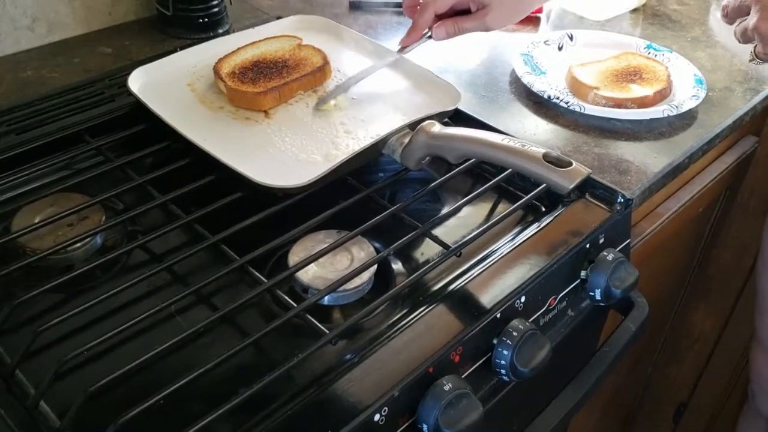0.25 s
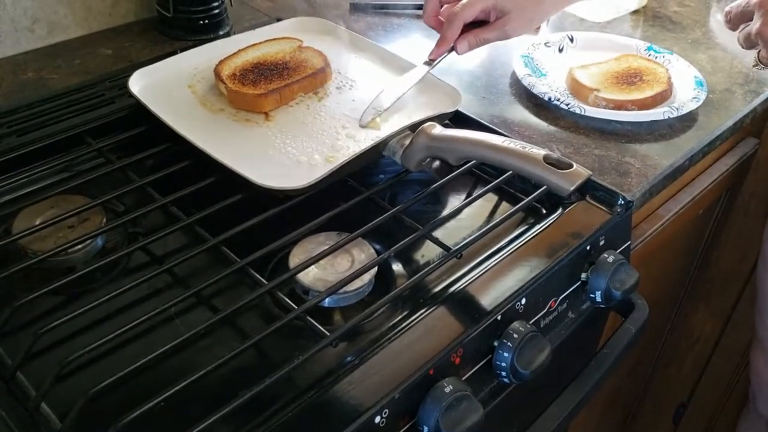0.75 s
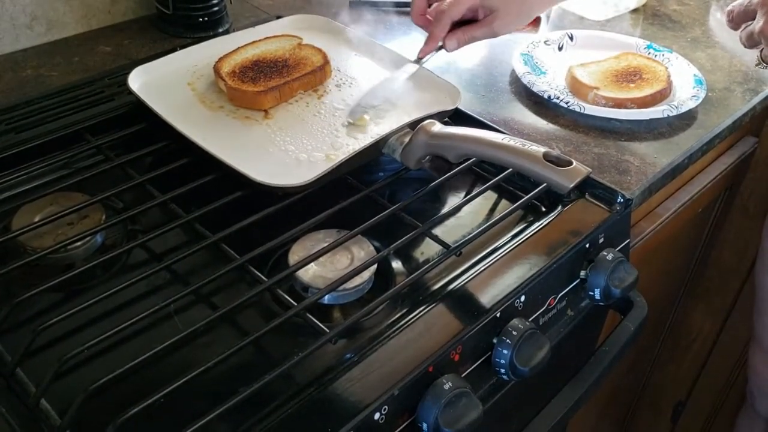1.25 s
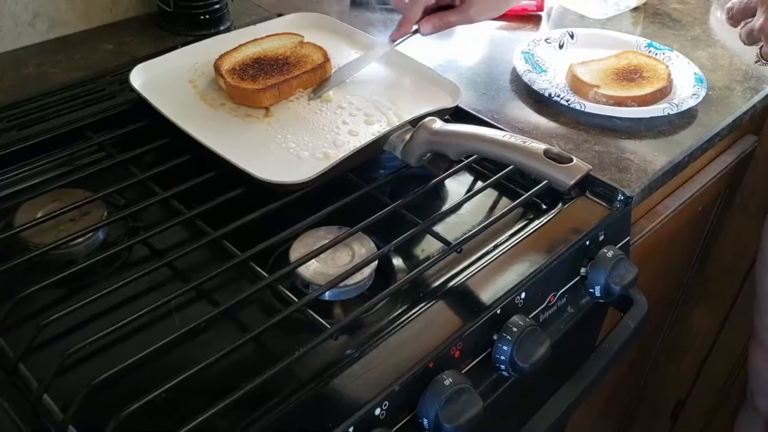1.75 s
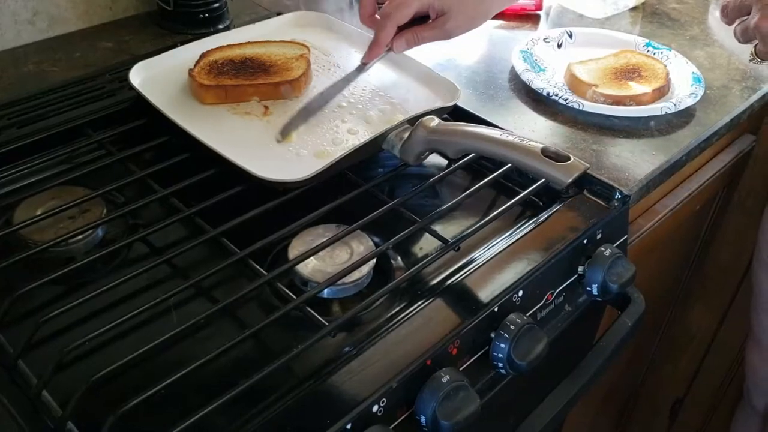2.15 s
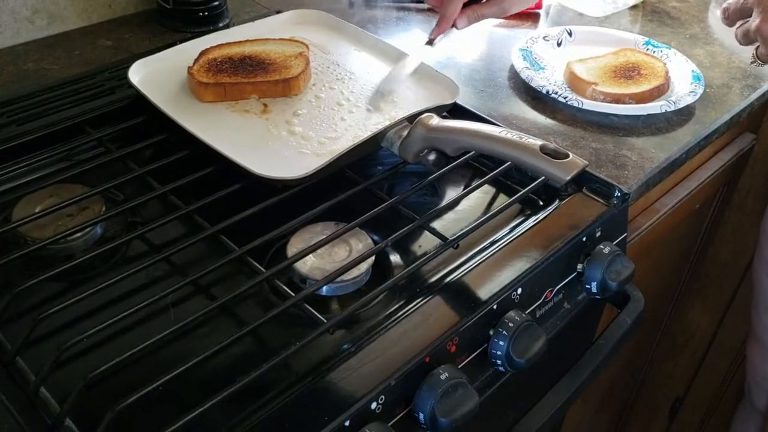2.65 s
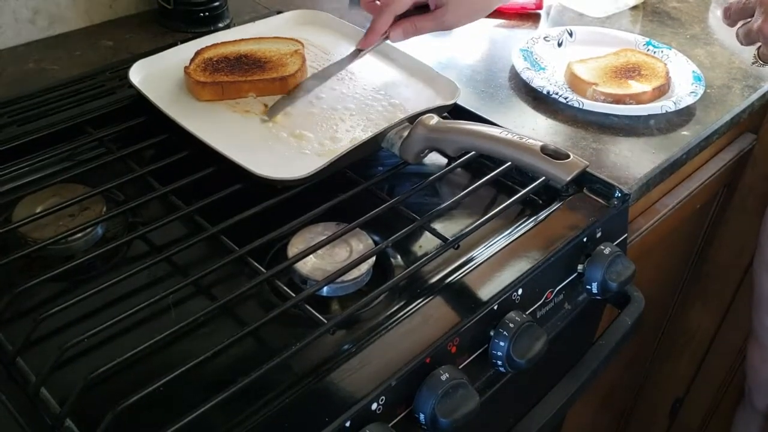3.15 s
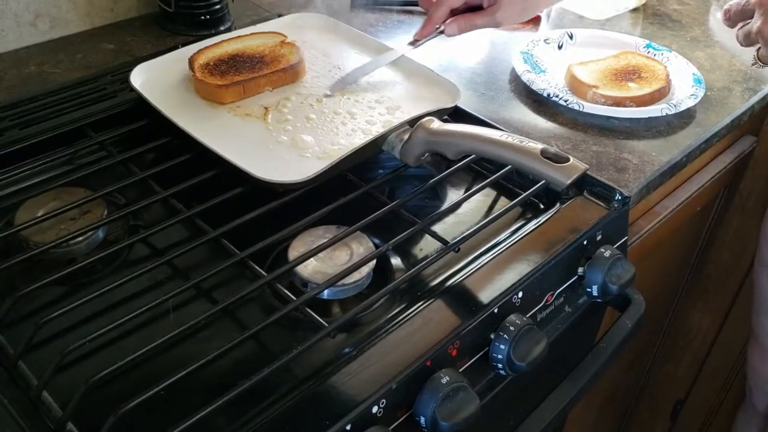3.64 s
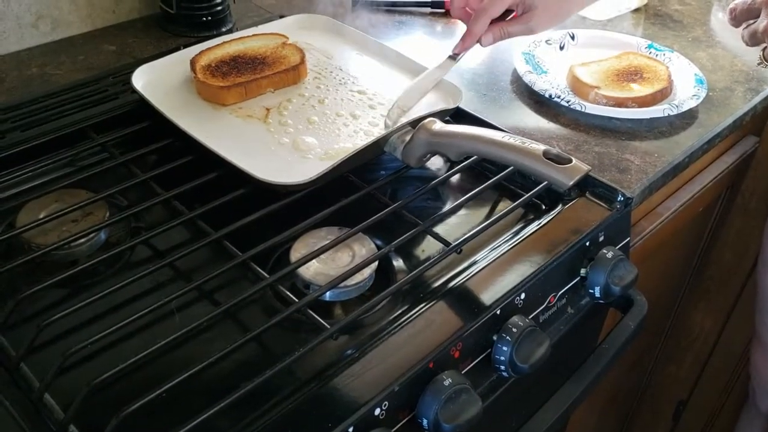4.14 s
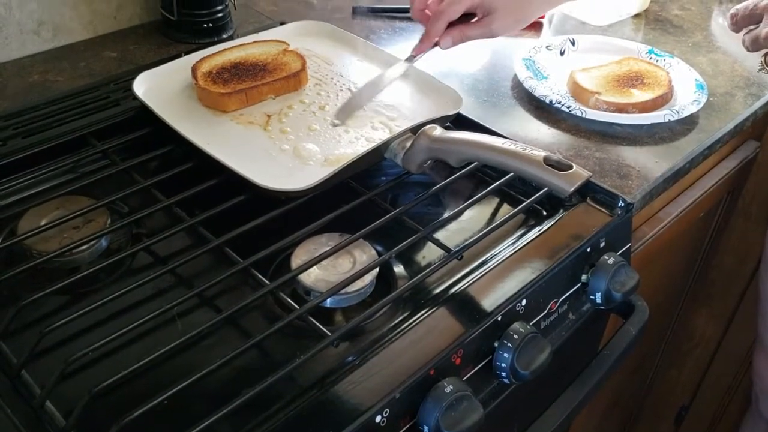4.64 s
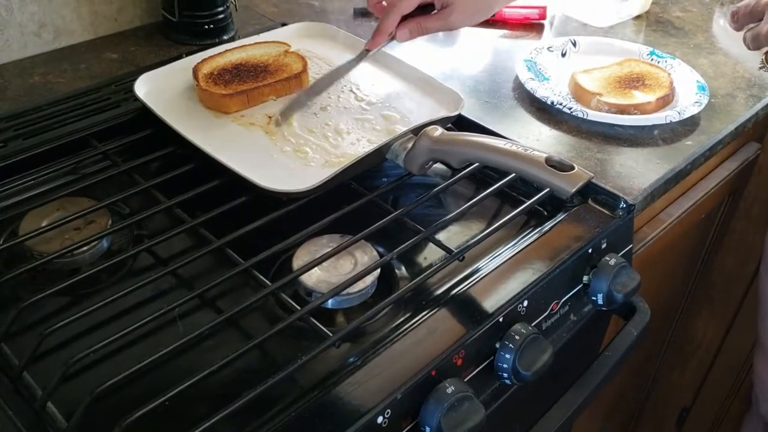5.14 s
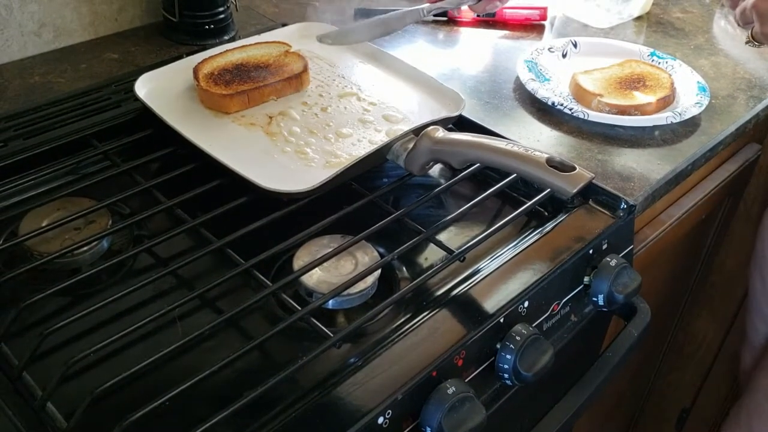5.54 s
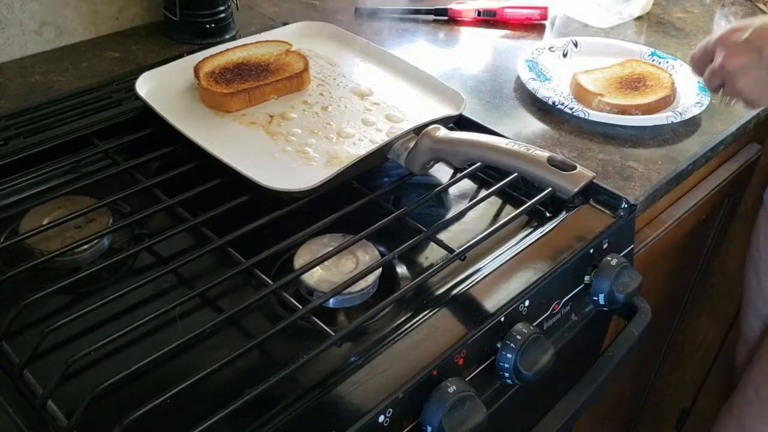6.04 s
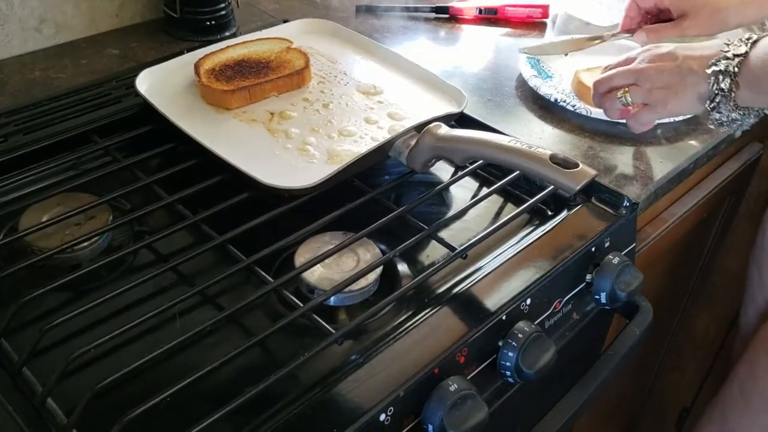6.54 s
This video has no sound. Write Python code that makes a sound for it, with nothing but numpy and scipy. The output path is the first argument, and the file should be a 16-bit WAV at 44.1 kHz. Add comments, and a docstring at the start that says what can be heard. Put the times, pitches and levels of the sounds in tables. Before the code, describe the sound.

Close in a small, fairly dry kitchen, butter sizzles as very high, fine fizz with crackly spitting. Early on a knife strikes the pan with a bright bouncing clink, the loudest event, quickly stilled. Short soft scrapes follow with a slightly squeaky, hollow metallic tone, firmer and busier toward the middle. Dull stove bumps occur occasionally; after the scraping stops, the sizzle continues and a paper plate rustles briefly. A faint low rumble leans left.

```python
"""Butter sizzles on a hot griddle pan over a gas ring in a small kitchen: dense random clicks make
fine fizz and coarse spitting, patchy narrow noise bands a low sizzle. Shaped noise makes a low rumble
of flame and house. A knife hits the pan, bounces and touches it again softly, ringing its modes, then
pushes the butter about in strokes whose clicks excite moving resonances. Soft bumps on the stove are
short damped rings; near the end a paper plate rustles."""
import sys
import numpy as np
from scipy import signal
from scipy.fft import rfft, irfft, next_fast_len
from scipy.io import wavfile
from scipy.ndimage import uniform_filter1d

SR = 44100
rng = np.random.default_rng(int(sys.argv[2]) if len(sys.argv) > 2 else 0)


def to_wav(s):
    """Save 16-bit WAV."""
    ch = np.atleast_2d(s).T  # columns
    pcm = np.round(np.clip(ch, -1, 1) * 32767)  # PCM
    wavfile.write(sys.argv[1], SR, pcm.astype(np.int16))


N = 299340

# frying curve, before trims: time_s, fizz_db, spit_db, low_sizzle_db
FRYING_LEVELS = [(0.0, -44, -53, -103), (0.23, -45, -60, -78), (0.38, -43, -68, -66), (0.47, -37, -50, -63),
                 (0.62, -37.5, -51.5, -70.5), (0.92, -42.5, -51.5, -68.5), (1.01, -32, -46.5, -55.5),
                 (1.17, -39, -50.5, -69), (1.28, -39, -53, -89.5), (1.53, -44.5, -54.5, -99),
                 (1.62, -34, -49, -62.5), (1.93, -35, -45.5, -68.5), (2.34, -35.5, -52, -63),
                 (2.53, -39.5, -52, -68), (2.76, -39, -53, -79.5), (2.82, -35.5, -51.5, -59),
                 (2.93, -39.5, -50, -87), (3.02, -36.5, -48, -64), (3.27, -37.5, -51, -77),
                 (3.36, -35.5, -47, -70), (3.57, -36.5, -50.5, -105.5), (3.85, -42.5, -51, -95),
                 (3.89, -37, -52, -102.5), (4.0, -39.5, -55, -111), (4.21, -53.5, -71.5, -111),
                 (4.25, -58.5, -85, -108), (4.42, -35.5, -47.5, -61), (4.58, -37, -52, -81),
                 (4.95, -39, -49, -69.5), (5.1, -36, -55, -74), (5.15, -40, -48.5, -105),
                 (5.33, -33.5, -52, -55), (5.52, -39, -53.5, -112), (5.61, -38, -49, -77.5),
                 (6.79, -41, -47.5, -70.5)]
# outline of fine fizz: freq_hz, density_db_per_hz
FIZZ_SPECTRUM = [(5000, -56), (7500, -7), (9500, -7), (11500, 2.5), (13000, 1), (14700, 8), (15600, 3),
                 (16500, -28.5)]
# outline of coarse spitting: freq_hz, density_db_per_hz
SPIT_SPECTRUM = [(2700, -48), (3250, -13), (3700, -5), (4500, -9.5), (6000, -6.5), (6800, -4), (8500, -7.5),
                 (11000, -4)]
# low sizzle, levels of its narrow bands: centre_hz, level_db
LOW_SIZZLE_BANDS = [(1600, -13.5), (1800, 6.5), (2100, -4), (2500, -0.5), (3000, -2.5), (3400, -11.5)]
# low rumble curve: time_s, level_db
RUMBLE_LEVELS = [(0.0, -55), (0.38, -57), (1.47, -54), (1.89, -67.5), (2.21, -50.5), (2.44, -61.5),
                 (3.1, -56), (3.33, -71), (3.38, -56.5), (3.97, -61), (6.71, -56), (6.79, -57.5)]
# outline of rumble: freq_hz, density_db_per_hz
RUMBLE_SPECTRUM = [(15, -51.5), (25, -16.5), (54, 6), (70, 8.5), (122, -2.5), (161, -17.5), (204, -12),
                   (259, -24.5), (298, -17.5), (420, -58), (550, -69.5), (920, -120)]
# knife on pan (a short noisy swell leads into the hit, then bounces and a late soft touch):
# start_s, level_db, rise_s, rattle_decay_s, sharpness_hz, ring_db
KNIFE_TAPS = [(0.244, -20, .02, 0.02, 12000, -60), (0.2608, -20, .0014, 0.01, 9000, -22),
              (0.2695, -25, .001, .01, 7000, -34), (0.2775, -23, .001, .012, 6000, -34),
              (0.289, -28, .001, .014, 5000, -45), (0.298, -31, .002, .05, 3500, -50),
              (0.403, -30, .002, 0.013, 6000, -38)]
# modes of the struck pan: pitch_hz, level_db, t60_s
STRUCK_MODES = [(450, -22, .22), (521, -20, .22), (588, -20, .28), (636, -9, .25), (856, -22, .1),
                (911, -20, .37), (968, -16, .5), (1039, -9, .12), (1113, -14, .24), (1158, -18, .18),
                (1416, -21, .18), (1513, -24, .28), (1901, -15, .25), (2073, -16, .27), (2155, -6, .13),
                (2580, -16, .3), (2602, -16, .33), (2632, -14, .24), (2848, -18, .15), (4237, -9, .1),
                (4315, -12, .09), (13313, -3, .07)]
# outline of blade rattle: freq_hz, density_db_per_hz
CLATTER_SPECTRUM = [(150, -73), (300, -30.5), (450, -7.5), (700, -12), (1100, -6.5), (1600, -23),
                    (2200, -7.5), (3300, -15.5), (4300, -1), (5900, -18.5), (7000, -6), (8200, -18),
                    (10500, -6), (13300, 0.5), (16000, 3)]
# soft bumps against the stove: start_s, level_db, pitch_hz
STOVE_BUMPS = [(2.274, -42.5, 227), (1.09, -66, 740), (2.547, -69, 635), (5.62, -41, 272), (6.0, -64, 400),
               (6.594, -71, 493), (6.684, -55, 310)]
# knife strokes: start_s, length_s, first_level_db, last_level_db, brightness_db, weight_db,
# first_main_resonance_hz
KNIFE_STROKES = [(1.446, 0.25, -71, -59.5, 6, -42, 997), (1.562, 0.1, -51.5, -44, -4.5, -65, 1081),
                 (1.733, 0.29, -51, -70, -4, -55, 1036), (1.97, 0.12, -75, -53, 3.5, -34, 1114),
                 (2.143, 0.039, -87.5, -87.5, 23, 20, 1095), (2.266, 0.15, -64, -74, 3.5, -6, 804.5),
                 (2.628, 0.047, -69, -89.5, 14, -3, 993), (2.727, 0.051, -54, -49.5, 0.5, -21.5, 1065),
                 (2.897, 0.093, -62.5, -50.5, 3, -9, 990), (3.052, 0.055, -51, -47, -4.5, -26, 1035),
                 (3.161, 0.081, -59, -70, 3.5, -42.5, 1009), (3.293, 0.1, -56, -64, 2, -22.5, 1070),
                 (3.439, 0.3, -61, -56, -2.5, -46, 1067), (3.63, 0.092, -49.5, -56, -6, -24.5, 1077),
                 (3.752, 0.14, -59, -63, -1, -41.5, 1016), (3.866, 0.064, -47.5, -60.5, -2, -25, 1057),
                 (4.244, 0.063, -56, -54.5, -3, -6.5, 999), (4.328, 0.092, -54, -51.5, 1, -16, 1023),
                 (4.452, 0.03, -70, -100, 7.5, -33, 1060), (4.621, 0.095, -53.5, -61, 2, -5.5, 1047),
                 (4.754, 0.027, -53.5, -52.5, -6, -36, 1019), (4.88, 0.092, -55.5, -50.5, 0.5, -17, 1025),
                 (4.97, 0.074, -44.5, -56, 1, -15.5, 1060), (5.123, 0.073, -46.5, -67, -4, -8.5, 1040),
                 (5.276, 0.032, -45, -43.5, -1, -3.5, 1035), (5.345, 0.057, -64, -73.5, -1, -1, 1040)]
# other pan resonances under the blade: centre_hz, width_hz, level_db
RUBBED_RESONANCES = [(394, 90, -1.5), (477, 71, -10.5), (653, 73, -21), (855, 77, -9.5), (1753, 88, -11),
                     (1827, 63, -4), (1942, 97, -9.5), (2455, 82, -10.5), (2583, 91, -9.5), (3540, 80, -7),
                     (3845, 118, -5.5), (3930, 77, -7), (5000, 170, -5.5)]
# upper pan resonances that sing along: pitch_hz, level_db (against the main one)
SUNG_OVERTONES = [(1860, -18.5), (2590, -4)]
# outline of paper plate rustle: freq_hz, density_db_per_hz
PLATE_SPECTRUM = [(500, -78), (850, 14), (1050, -51), (1200, 1), (1350, -26), (1550, 10), (1950, 8),
                  (2500, 4.5), (3400, 8)]
# microphone colour: freq_hz, left_minus_right_db
PORT_BALANCE = [(60, -12.5), (150, -1), (260, 2), (450, 12.5), (700, 0), (1290, -5), (2400, 2),
                (4400, -4.5), (8100, -4), (15000, -9)]

# frying
SPIT_TRIM_DB, LOW_SIZZLE_TRIM_DB = 3.5, 6.0
SPIT_UNEVEN_DB, SPIT_MEAN_DB = 2.5, -47.5
LOW_SPIT_EXTRA = 0.97   # share by which the lowest band exaggerates a sink below the mean
LOW_SIZZLE_WAVER_DB, LOW_SIZZLE_WAVER_HZ = 4.5, 5.0
# spitting thrown up by a firm stroke; share of the stroke's swing it follows
STROKE_SPATTER_DB, SPATTER_FOLLOWS = -56, 0.99
TAP_SPATTER_DB, TAP_FIZZ_DB = -3, -23   # against the tap's level
TAP_SPATTER_DECAY_S, TAP_SPATTER_RISE_S = 0.0067, 0.003
# rumble
RUMBLE_WAVER_DB = 1.5
RUMBLE_LEFT_DB, RUMBLE_TOP_LEFT_DB = 13.5, 9   # left minus right
# the blade comes to rest on the pan and stills it
DAMPED_FROM_S, DAMPING_DB_PER_S = .45, 280
# strokes
STROKE_RISE_DB_PER_S, STROKE_FALL_DB_PER_S, LIFTED_DB = 902, 703, -125
PAN_REST_HZ, PAN_SETTLE_S = 1074, 0.099   # the main resonance settles here during a stroke
FIRM_DB, UPPER_FOLLOWS = -58.5, 0.93   # upper resonances swing less than the main one around firm
# the squeal is steadier than the scrape: level, share of swing evened out, most lift
SQUEAL_DB, SQUEAL_EVENS, SQUEAL_MOST_DB = -4.5, 0.28, 1
SQUEAL_FLICKER_HZ = 31
LOW_LUMPS_DB, LOW_LUMPS_RATE_HZ = 8, 10   # dips between lumps of the low resonances
# rustle, room, top
RUSTLE_S, RUSTLE_LENGTH_S, RUSTLE_DB = 6.675, .016, -41
KITCHEN_T60_S, WALL_CUT_HZ = 0.16, 7600
CUTOFF_HZ = 15950


def from_db(db):
    """dB to gain."""
    return 10 ** (np.asarray(db) / 20)


def rms_one(x):
    """Scales to rms 1."""
    return x / np.sqrt(np.mean(x ** 2) + 1e-20)


def in_time(rows):
    """Columns of a curve table, sample by sample."""
    time_s, *columns = np.transpose(rows)
    return [np.interp(np.arange(N) / SR, time_s, column) for column in columns]


def colour(x, spectrum):
    """Shapes a signal to a (Hz, dB) outline, linear in log frequency."""
    hz = np.maximum(np.fft.rfftfreq(N, 1 / SR), 1)
    hz_points, db_points = np.transpose(spectrum)
    gain_db = np.interp(np.log(hz), np.log(hz_points), db_points)
    return irfft(rfft(x) * from_db(gain_db), N)


def drift(rate_hz):
    """Slow random curve of rms 1: noise through a double one-pole low-pass, one point per 40 samples."""
    pole = np.exp(-80 * np.pi * rate_hz / SR)
    noise = rng.standard_normal(N // 40 + 2002)
    slow = signal.lfilter([1], [1, -2 * pole, pole * pole], noise)[2000:]   # skips the settling
    return np.interp(np.arange(N) / 40, np.arange(len(slow)), rms_one(slow))


def clicks(per_s, spread_db, size=N):
    """Random clicks of either sign; their dB sizes are spread exponentially from 0, up to 5 spreads."""
    sizes = from_db(spread_db * np.minimum(rng.exponential(1, size), 5))
    signed = sizes * rng.choice([-1, 1], size)
    return signed * (rng.random(size) < per_s / SR) + 1e-18


def ring(x, hz, t60_s):
    """Two-pole resonator: a unit click sets a decaying sine of height 1 ringing."""
    r, w = from_db(-60 / (t60_s * SR)), 2 * np.pi * hz / SR
    return signal.lfilter([0, np.sin(w)], [1, -2 * r * np.cos(w), r * r], x)


def resonance(x, hz, width_hz):
    """Steep band around a centre that may move: shift down, low-pass, shift back; noise keeps its level."""
    turn = np.exp(2j * np.pi * np.cumsum(hz * np.ones(N)) / SR)
    low = signal.sosfilt(signal.butter(6, width_hz / 2, fs=SR, output="sos"), x / turn)
    return (low * turn).real * np.sqrt(2 * SR / width_hz)


def bubbles(spectrum, per_s, spread_db, patchy_db, hiss):
    """Bursts at six spots on the pan, each leading by its own lag on the right, over a smooth hiss."""
    out = np.zeros((2, N))
    for lead in range(2, 38, 6):
        rate_per_s = per_s / 6 * from_db(patchy_db * drift(20))
        spot = clicks(rate_per_s, spread_db)
        out += [np.roll(spot, lead), spot]
    out = rms_one(out) + hiss * rng.standard_normal((2, N))
    return rms_one(colour(out, spectrum))


def uneven_bands(x, level_db):
    """Noise bands with separate random levels; the spitting gets thinner below when quiet."""
    out, edges_hz = 0, np.geomspace(2600, 12000, 14)
    for k, (low_hz, high_hz) in enumerate(zip(edges_hz, edges_hz[1:])):
        band_pass = signal.butter(2, [low_hz, high_hz], "band", fs=SR, output="sos")
        band = signal.sosfilt(band_pass, x)
        sink_db = LOW_SPIT_EXTRA * (1 - k / 12) ** 2 * np.minimum(level_db - SPIT_MEAN_DB, 0)
        out = out + band * from_db(sink_db + SPIT_UNEVEN_DB * drift(15.0)) * (-1) ** k
    return out


def low_sizzle():
    """Patchy narrow noise bands at 1.6-3.4 kHz that come and go, each with its own lag on the left."""
    out = np.zeros((2, N))
    hz_points, db_points = np.transpose(LOW_SIZZLE_BANDS)
    for hz in np.geomspace(hz_points[0], hz_points[-1], 11):
        patch_db = 45.0 * np.minimum(drift(6.0), .1)
        gain = from_db(np.interp(hz, hz_points, db_points) + patch_db)
        band = gain * resonance(rng.standard_normal(N), hz, width_hz=hz / 16)
        out += [np.roll(band, rng.integers(0, 30)), band]
    waver = from_db(LOW_SIZZLE_WAVER_DB * np.minimum(drift(LOW_SIZZLE_WAVER_HZ), 1))
    return rms_one(out * waver)


def frying(blade_db):
    """Fizz, spitting and low sizzle on their own levels; knife strokes and taps throw up more spitting."""
    fizz_db, spit_db, low_sizzle_db = in_time(FRYING_LEVELS)
    t = np.arange(N) / SR
    jolt = 0
    for start_s, level_db, *_ in KNIFE_TAPS[1:]:   # the opening swell adds no spitting
        since = np.maximum(t - start_s, 0)
        swell = 1 - np.exp(-since / TAP_SPATTER_RISE_S)
        jolt = jolt + from_db(level_db) * np.exp(-since / TAP_SPATTER_DECAY_S) * swell
    stirred = from_db(STROKE_SPATTER_DB + SPATTER_FOLLOWS * (blade_db - FIRM_DB))

    fizz_gain = from_db(fizz_db) + from_db(TAP_FIZZ_DB) * jolt
    fizz = fizz_gain * bubbles(FIZZ_SPECTRUM, per_s=6200, spread_db=3.5, patchy_db=7.5, hiss=1.0)

    spit_gain = np.hypot(from_db(spit_db + SPIT_TRIM_DB), stirred) + from_db(TAP_SPATTER_DB) * jolt
    bursts = bubbles(SPIT_SPECTRUM, per_s=4000, spread_db=-1.0, patchy_db=8.5, hiss=1.0)
    spit = spit_gain * uneven_bands(bursts, 20 * np.log10(spit_gain))
    return fizz + spit + from_db(low_sizzle_db + LOW_SIZZLE_TRIM_DB) * low_sizzle()


def rumble():
    """Low noise of flame and house from the left, largely alike on both sides; its upper part flutters."""
    mid, side = colour(rng.standard_normal((2, N)), RUMBLE_SPECTRUM)
    pair = rms_one(mid + 0.53 * side * np.array([[1], [-1]]))
    low = signal.sosfilt(signal.butter(4, 210, "low", fs=SR, output="sos"), pair)
    high = signal.sosfilt(signal.butter(4, 210, "high", fs=SR, output="sos"), pair)
    lean = np.array([[.5], [-.5]])
    flutter_db = 5.5 * drift(2.6) - 1.0
    pair = low * from_db(RUMBLE_LEFT_DB * lean) + high * from_db(flutter_db + RUMBLE_TOP_LEFT_DB * lean)
    return from_db(in_time(RUMBLE_LEVELS)[0] + RUMBLE_WAVER_DB * drift(13.0)) * pair


def taps():
    """Each touch rings the pan's modes and makes the blade rattle for a moment; gives ring and rattle."""
    modes_hz, modes_db, modes_t60_s = np.transpose(STRUCK_MODES)
    count, span = len(modes_hz), SR // 4
    forces, clatter = np.full((count, N), 1e-18), np.zeros(N)
    since = np.arange(span) / SR
    for start_s, level_db, rise_s, decay_s, sharp_hz, ring_db in KNIFE_TAPS:
        at = round(start_s * SR)
        # every mode starts up to 2.5 ms late, at a slightly random strength
        late = rng.integers(0, SR // 400, count)
        strength_db = rng.normal(0, 1.5, count)
        forces[np.arange(count), at + late] += from_db(ring_db + modes_db + strength_db)
        envelope = from_db(level_db) * np.exp(-since / decay_s) * (1 - np.exp(-since / rise_s)) ** 2
        rattle = envelope * rms_one(clicks(4000, 0.55, size=span))
        low_pass = signal.butter(1, min(sharp_hz, .45 * SR), fs=SR)
        clatter[at:at + span] += signal.lfilter(*low_pass, rattle)
    rings = sum(ring(force, hz, t60_s) for force, hz, t60_s in zip(forces, modes_hz, modes_t60_s))
    # a thin pan radiates no bass
    rings = signal.sosfilt(signal.butter(4, 380, "high", fs=SR, output="sos"), rings)
    damping = from_db(-DAMPING_DB_PER_S * np.maximum(np.arange(N) / SR - DAMPED_FROM_S, 0))
    return rings * damping, from_db(10.0) * colour(clatter, CLATTER_SPECTRUM)


def bumps():
    """Each bump is one dull, short ring: a click through three damped resonators in series."""
    out = np.zeros(N)
    for start_s, level_db, hz in STOVE_BUMPS:
        push = np.full(N, 1e-18)
        push[round(start_s * SR)] = from_db(level_db - 22.5)
        body = ring(push, hz, 0.023)
        body = ring(body, hz * 0.77, 0.0098)
        out += ring(body, hz * 1.18, 0.016) * from_db(-34.0)
    return out


def strokes():
    """Blade level, brightness, weight (dB), main resonance (Hz): strokes land, hold, lift; firmest leads."""
    t = np.arange(0, N / SR + .002, .001)
    columns = np.transpose(KNIFE_STROKES)[:, :, None]
    start_s, length_s, first_db, last_db, bright_db, weight_db, first_hz = columns
    since = t - start_s
    held_db = first_db + (last_db - first_db) * np.clip(since / length_s, 0, 1)
    landing_db = STROKE_RISE_DB_PER_S * np.minimum(since, 0)
    lifting_db = STROKE_FALL_DB_PER_S * np.maximum(since - length_s, 0)
    each_db = held_db + landing_db - lifting_db
    settling = np.exp(-(np.maximum(since, 0) / PAN_SETTLE_S) ** 2)
    each_hz = PAN_REST_HZ + (first_hz - PAN_REST_HZ) * settling
    lead = each_db.argmax(axis=0)
    level_db = np.maximum(each_db.max(axis=0), LIFTED_DB)
    main_hz = each_hz[lead, np.arange(len(t))]
    curves = level_db, bright_db[lead, 0], weight_db[lead, 0], main_hz
    return in_time(np.transpose([t, *uniform_filter1d(curves, size=9)]))   # smoothed over 9 ms


def sing(hz):
    """Sine on a moving pitch."""
    return np.sin(2 * np.pi * np.cumsum(hz) / SR)


def scraping(level_db, bright_db, weight_db, main_hz):
    """The blade catches on the rough coat in dense clicks that excite pan resonances damped by butter."""
    upper_db = bright_db + (UPPER_FOLLOWS - 1) * (level_db - FIRM_DB)
    catches = rms_one(clicks(900 * from_db(4.0 * drift(30)), 2.85))
    # the main resonance bends as the blade loads other parts of the pan
    out = resonance(catches, main_hz, width_hz=140.0) * from_db(-8.0)
    core_hz = main_hz * (1 + 0.012 * drift(6.0))
    out += resonance(catches, core_hz, width_hz=43.8) * from_db(-4.5)

    evened_db = np.minimum(SQUEAL_EVENS * (FIRM_DB - level_db), SQUEAL_MOST_DB)
    squeal_db = SQUEAL_DB + evened_db + 2.0 * drift(SQUEAL_FLICKER_HZ)
    out += from_db(squeal_db) * sing(main_hz * (1 + 0.01028 * drift(15.8)))
    for hz, db in SUNG_OVERTONES:
        sung_hz = hz * (1 + 0.012 * drift(14.0))
        out += from_db(squeal_db + db + upper_db + 6.5 * drift(14.0)) * sing(sung_hz)

    for hz, width_hz, db in RUBBED_RESONANCES:
        if hz < 900:   # low resonances come in soft lumps
            lean_db = weight_db + LOW_LUMPS_DB * np.minimum(drift(LOW_LUMPS_RATE_HZ) - .5, 0)
        else:
            lean_db = upper_db
        wander_hz = hz * (1 + 0.0167 * drift(6.92))   # each bends and flickers on its own
        flicker_db = 4.5 * drift(31.0)
        out += resonance(catches, wander_hz, width_hz) * from_db(db + lean_db + flicker_db)
    touching = level_db > LIFTED_DB + 1
    return from_db(level_db) * touching * out


def rustle():
    """Paper plate as bread is lifted: a soft crackle in the plate's resonances swells and fades."""
    swell = np.exp(-((np.arange(N) / SR - RUSTLE_S) / RUSTLE_LENGTH_S) ** 2)
    return from_db(RUSTLE_DB) * swell * rms_one(colour(clicks(2700, 1.8), PLATE_SPECTRUM))


def kitchen(x):
    """Room reverberation: eight feedback delays a side, duller on every round."""
    size = next_fast_len(N + SR)
    w = 2 * np.pi * np.fft.rfftfreq(size)
    dull = 1 / (1 + 1j * w * SR / (2 * np.pi * WALL_CUT_HZ))
    out = np.zeros((2, len(w)), complex)
    for k, lag in enumerate(rng.uniform(.008, 0.027, 16) * SR):
        loop = from_db(-60 * lag / SR / KITCHEN_T60_S) * dull * np.exp(-1j * w * lag)
        out[k % 2] += loop / (1 - loop) * (-1) ** (k // 2)
    return irfft(out * rfft(x, size), size)[:, :N]


def scene():
    """Pan sounds with their room, over frying and rumble."""
    blade = strokes()
    rings, clatter = taps()
    pan = scraping(*blade) + clatter + bumps() + rustle()
    direct = np.array([np.roll(pan + rings, 4), pan + rings])   # the right side is a little nearer
    room = from_db(-4.5) * kitchen(pan + from_db(-16.0) * rings)
    return frying(blade[0]) + direct + room + rumble()


def record(dry):
    """The two microphone ports differ in colour; the top is cut."""
    left = colour(dry[0], [(hz, db / 2) for hz, db in PORT_BALANCE])
    right = colour(dry[1], [(hz, -db / 2) for hz, db in PORT_BALANCE])
    top_cut = signal.ellip(14, .5, 80, CUTOFF_HZ, fs=SR, output="sos")
    return signal.sosfilt(top_cut, [left, right])


dry = scene()
out = record(dry)
to_wav(out)
```